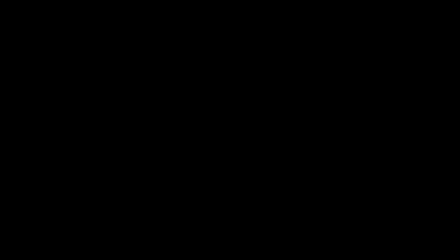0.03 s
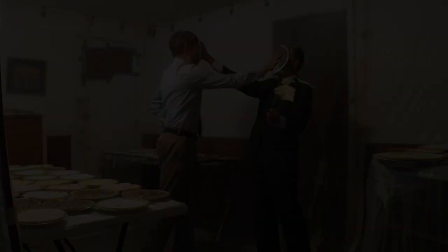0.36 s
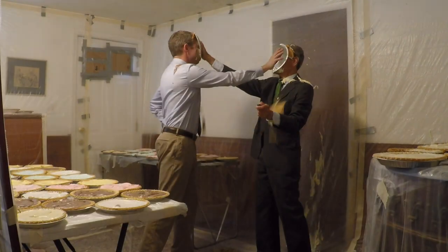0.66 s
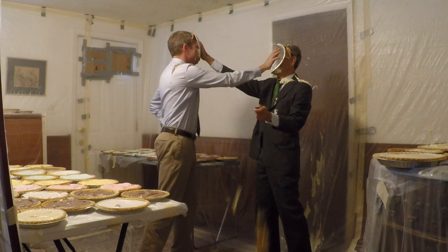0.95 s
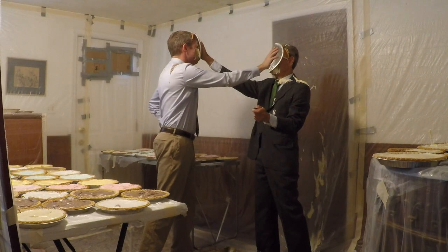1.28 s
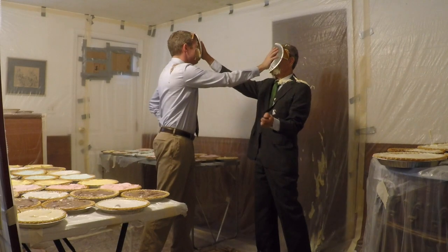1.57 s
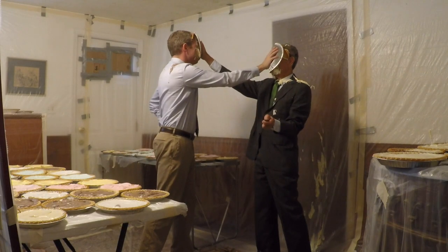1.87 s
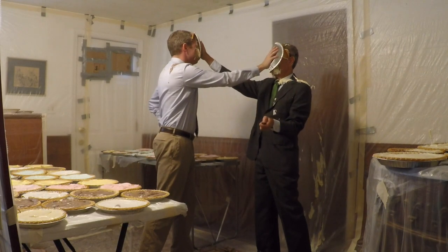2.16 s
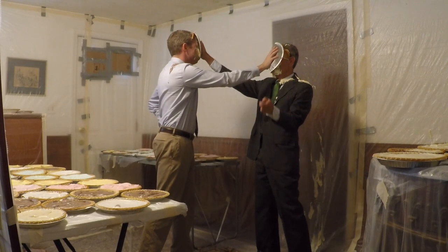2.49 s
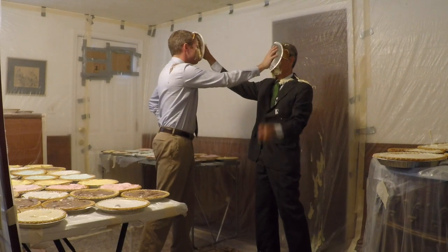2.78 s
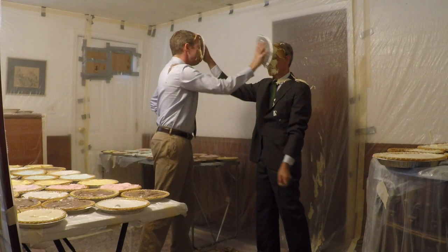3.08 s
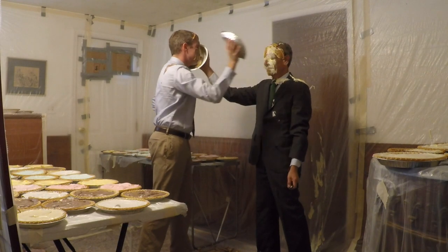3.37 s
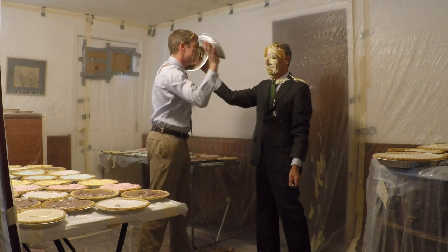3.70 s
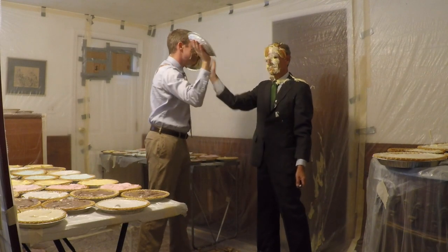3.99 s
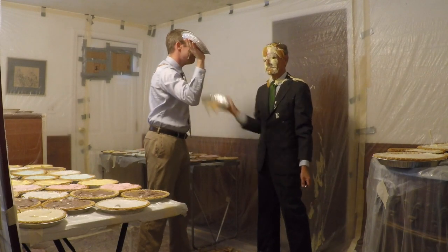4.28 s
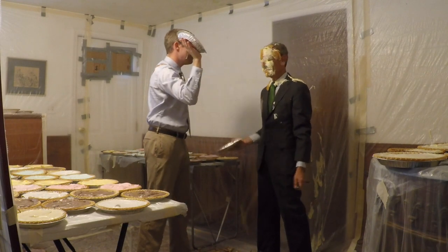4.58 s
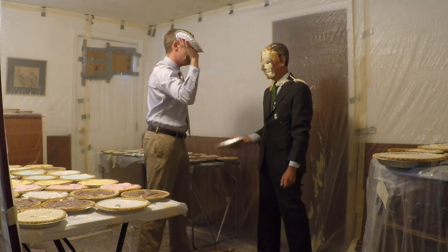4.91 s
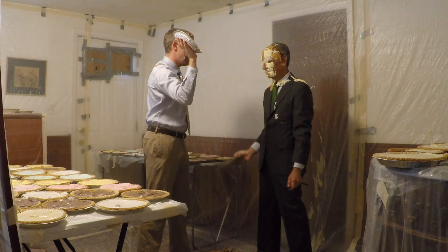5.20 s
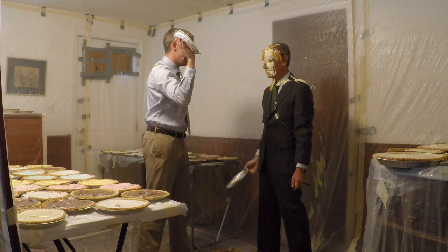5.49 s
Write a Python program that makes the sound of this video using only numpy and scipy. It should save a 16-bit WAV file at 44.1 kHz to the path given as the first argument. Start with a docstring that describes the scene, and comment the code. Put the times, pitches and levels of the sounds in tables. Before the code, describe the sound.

Cream pies are ground into faces with a soft, crackling squelch, and gobs of filling splat onto plastic sheeting. Three times a foil tin buckles with sharp cracks and a hollow knock. The tins then peel away in a run of sticky smacks, and a few more gobs fall. The microphone picks up a small room with a short ring, faint hiss and a low rumble that grows into a soft drone.

```python
"""Cream pies in the face

Two people grind cream pies into each other's faces in a small room draped with plastic sheet.
The filling squelches, gobs of it fall and splat on the sheet, and cream smacks as the tins peel away.
Now and then a foil tin buckles and springs back with a crack, a pop and a hollow knock.
Under it all lie a low room rumble and a faint hiss, joined late by a deep swell and a drone."""
import sys
import numpy as np
from scipy import signal
from scipy.fft import rfft, irfft, next_fast_len
from scipy.io import wavfile
from scipy.ndimage import map_coordinates

SR = 44100
rng = np.random.default_rng(int(sys.argv[2]) if len(sys.argv) > 2 else 0)


def waveform_to_disk(signal):
    """Save audio, clipped to [-1, 1], as 16-bit WAV at the path in sys.argv[1]."""
    frames = np.transpose(np.atleast_2d(signal))
    scaled = np.clip(frames, -1, 1) * 32767
    samples = np.round(scaled).astype(np.int16)
    wavfile.write(sys.argv[1], SR, samples)


N = 249165

# the low end of the room tone: freq_hz, level_db
RUMBLE_SPECTRUM = [(12, -37), (20, -9.5), (65, -2.5), (79, -12), (97, -17), (123, -10), (140, -23),
                   (177, -15.5), (205, -24.5), (244, -17.5), (268, -28.5), (315, -17), (335, -27.5),
                   (900, -38), (1170, -78), (1980, -120)]
# the airy top of the room tone: freq_hz, level_db
HISS_SPECTRUM = [(500, -20), (900, 2), (1600, -0.5), (2400, 1), (5000, -1), (8000, -8), (13800, -10.5),
                 (15500, -14.5)]
# how long the walls ring: freq_hz, t60_s
ROOM_DECAY = [(150, 0.52), (600, 0.28), (3000, 0.24), (12000, 0.3)]
# slow pushes and wipes of a tin across a face: start_s, hold_s, level_db
STROKES = [(0.139, 0.14, -50.5), (.3, 0.27, -49), (.56, 0.12, -51.5), (1.002, 0.13, -55), (1.45, 0.16, -65),
           (3.352, 0.093, -59.5), (3.9, .2, -63.5), (4.15, 0.19, -62), (4.48, .5, -69)]
# suction letting go between tin and skin: start_s, level_db, hollow_over_crackle_db
SMACKS = [(1.582, -56.5, -15), (2.686, -47, -16.5), (3.034, -57, 5), (3.325, -52, 5.5), (3.38, -50, 6.5),
          (3.486, -48.5, 4), (3.569, -49.5, 0.5), (3.778, -54.5, 2), (3.794, -50, 5), (3.832, -56, -2),
          (3.891, -66.5, 15.5)]
# the sticky crackle of a smack: freq_hz, level_db
SUCTION_SPECTRUM = [(600, 5), (1300, 4), (1700, -1.5), (2300, 0.5), (2750, 4), (3300, 0), (4300, -4),
                    (5500, -13), (8700, -30), (15000, -35)]
# the hollow behind a peeling tin: freq_hz, level_db
CAVITY_SPECTRUM = [(150, -25), (300, -18.5), (420, -6.5), (530, -4.5), (640, 1), (750, -0.5), (830, -11),
                   (1100, -11.5), (1600, -29), (3500, -49)]
# foil buckling: start_s, crack_db, crack_hz, width_octaves, knock_db
FOIL_SNAPS = [(.768, -24.5, 3840, .17, -29), (0.78, -21, 4000, 0.59, -20.5), (.816, -33.5, 6700, 0.41, -27),
              (2.3388, -37.5, 6000, 1.5, -27.5), (2.377, -30.5, 2600, 0.59, -28),
              (2.821, -23.5, 3840, 0.11, -36), (2.827, -34.5, 1900, 0.6, -25.5),
              (2.833, -27, 3660, .26, -26.5), (2.869, -33.5, 6300, 0.59, -28.5)]
# the hollow knock of a cream-filled tin: pitch_hz, level_db, t60_s
TIN_MODES = [(58, -10, 0.099), (123.4, -7.5, 0.125), (313.4, -5, 0.072), (523, -10, 0.11),
             (577, -4.5, 0.077), (615.5, -0.5, 0.1), (743, -5.5, 0.068), (846, -13.5, 0.1),
             (1055, -6, 0.061), (1820, -12.5, 0.03)]
# gobs landing on the sheet: start_s, level_db, weight (0 = fleck, 1 = heavy lump), t60_s
SPLATS = [(.167, -58, 0.64, .1), (.278, -42.5, 0.84, 0.46), (.315, -43.5, 0.44, 0.47),
          (.379, -44.5, 0.96, 0.3), (.432, -43.5, 0.39, .035), (.624, -38.5, 0.66, 0.22),
          (.707, -42, .8, 0.61), (.75, -45, 0.95, .08), (.8155, -35, 0.077, 0.035), (.985, -38, 0.92, 0.17),
          (.998, -39.5, 0.84, 0.25), (1.066, -42, 0.96, .15), (1.076, -34.5, 0.81, 0.25),
          (1.152, -43, 0.91, 0.24), (1.204, -42, .8, 0.32), (1.474, -52.5, 0, .12), (1.558, -52.5, 0, 0.14),
          (2.267, -44.5, 0.34, 0.085), (2.337, -38, 0.5, 0.11), (2.354, -42, 0.19, .1),
          (2.367, -38.5, 0.43, .09), (2.39, -39.5, 0.51, 0.1), (2.41, -45, 0.58, .05),
          (2.803, -38.5, 0.31, 0.14), (2.868, -39.5, 0.59, 0.1), (3.96, -56.5, 0.16, 0.19),
          (4.105, -55, 0.46, 0.35), (4.144, -49, 0.72, 0.29), (4.179, -44.5, 0.44, 0.21),
          (4.248, -48.5, 0, 0.12), (4.374, -57, 0, 0.65), (4.685, -44.5, 0.73, 0.16),
          (4.725, -43, 0.79, 0.21), (4.74, -41.5, 0.89, 0.2), (4.891, -56.5, 0, 0.12),
          (4.972, -49, 0.081, .13), (5.021, -56, 0.44, .2)]
# the dull thud of a gob on the sheet: freq_hz, level_db
THUD_SPECTRUM = [(50, -9.5), (130, -15.5), (180, -3.5), (220, -4.5), (260, -7.5), (340, -4.5), (520, -18.5),
                 (1500, -55)]
# the round, wet body of squashed cream: freq_hz, level_db
PLOP_SPECTRUM = [(120, -40), (300, -3.5), (410, -4.5), (500, 1.5), (600, 2), (760, -3), (900, -11),
                 (1150, -11.5), (1550, -33.5), (3500, -38)]
# the bright spatter of fine droplets: freq_hz, level_db
SPRAY_SPECTRUM = [(500, -9), (1200, -3), (1650, -6), (2500, 1.5), (3000, 1.5), (3400, -3), (4100, 1),
                  (4700, -3), (5900, -1), (7000, -9), (8800, -16), (13700, -18), (15500, -36)]


def amp(db):
    """Decibels to gain."""
    return 10 ** (np.asarray(db) / 20)


def curve_at(points, hz):
    """A curve of (freq_hz, value) points, read on a log frequency axis."""
    freqs, values = np.transpose(points)
    return np.interp(np.log(hz + 1), np.log(freqs + 1), values)


def wobble(rate_hz):
    """A smooth random drift with rate_hz knots a second."""
    knots = rng.standard_normal(int(N * rate_hz / SR) + 4)
    return map_coordinates(knots, [np.arange(N) * rate_hz / SR])


def colour(x, spectrum):
    """EQ a sound to a spectrum with a minimum-phase filter of unit energy."""
    size = 4096
    gain = amp(curve_at(spectrum, np.fft.rfftfreq(size, 1 / SR)))
    cepstrum = irfft(np.log(gain))
    cepstrum[1:size // 2] *= 2  # folded forward, so nothing rings ahead of a hit
    cepstrum[size // 2 + 1:] = 0
    response = irfft(np.exp(rfft(cepstrum)))
    return signal.fftconvolve(x, response / np.linalg.norm(response))[:len(x)]


def add(track, start_s, sound):
    """Mix a sound in at start_s."""
    part = track[max(round(start_s * SR), 0):][:len(sound)]
    part += sound[:len(part)]


def shaped(grain, envelope):
    """A texture under an envelope, scaled to the envelope's energy."""
    return grain * envelope * np.linalg.norm(envelope) / np.linalg.norm(grain * envelope)


def droplets(size, per_s, spread_db):
    """Tiny impacts at random moments and of scattered sizes, rms 1."""
    lands = rng.random(size) < per_s / SR
    clicks = lands * rng.choice([-1, 1], size)
    clicks = clicks * amp(spread_db * np.clip(rng.standard_normal(size), -2, 2))
    return clicks / np.sqrt(np.mean(clicks ** 2) + 1e-20)


def wet_bursts(events, spectrum, drops_per_s, rise_s, hold_s):
    """A few droplets run ahead, the mass hits and spreads, and the patter dies away."""
    out = np.zeros(N)
    t = np.arange(-SR // 32, SR // 3) / SR
    forerunners = amp(-17 - 60 * np.abs(t) / 0.051)
    for start_s, level_db, t60_s, shift_octaves in events:
        attack = 1 - np.exp(-np.maximum(t, 0) / rise_s)
        decay = amp(-60 * np.maximum(t - hold_s, 0) / t60_s)
        envelope = np.maximum(forerunners, attack * decay)
        patter = shaped(droplets(len(t), drops_per_s, spread_db=3), envelope)
        pitched = [(hz * 2 ** shift_octaves, db) for hz, db in spectrum]
        add(out, start_s + t[0], amp(level_db) * colour(patter, pitched))
    return out


def room(x, wet_db):
    """The direct sound and the quick answer of the walls, in which the bass rings longest."""
    hz, t, noise = signal.stft(rng.standard_normal(SR // 2), SR, nperseg=256)
    decay = amp(-60 * t / curve_at(ROOM_DECAY, hz)[:, None])
    tail = signal.istft(noise * decay, SR, nperseg=256)[1]
    tail = np.pad(tail / np.linalg.norm(tail), (round(0.003 * SR), 0))  # 3 ms of pre-delay
    return x + amp(wet_db) * signal.fftconvolve(x, tail)[:N]


def hum(pitch_hz, drift_hz):
    """A sine of rms 1 whose pitch wavers."""
    return np.sqrt(2) * np.sin(2 * np.pi * np.cumsum(pitch_hz + drift_hz * wobble(22)) / SR)


def room_tone(swell_peak_s=4.19, drone_start_s=4.6):
    """A bed of rumble and hiss, one brief deep swell, and a low drone that sets in and stays."""
    t = np.arange(N) / SR
    rumble = amp(-50) * colour(rng.standard_normal(N), RUMBLE_SPECTRUM)
    hiss = amp(-66) * colour(rng.standard_normal(N), HISS_SPECTRUM)
    drone = amp(-50) * np.clip((t - drone_start_s) / 0.22, 0, 1) * hum(66.2, drift_hz=2.67)
    swell = amp(-44.5) / (1 + ((t - swell_peak_s) / 0.16) ** 2) * hum(42, drift_hz=2.75)
    return rumble + hiss + drone + swell


def pressure_db(rise_db_per_s=84, fall_db_per_s=53):
    """Each stroke builds, holds and eases off; the strongest at any moment sets the level."""
    t = np.arange(N) / SR
    strokes = [level_db - rise_db_per_s * np.maximum(start_s - t, 0)
               - fall_db_per_s * np.maximum(t - start_s - hold_s, 0)
               for start_s, hold_s, level_db in STROKES]
    return np.max(strokes, axis=0)


def smear():
    """Cream squeezed between tin and face squelches and crackles in clumps, louder under pressure."""
    flow = amp(pressure_db() + 1.3 * wobble(60))
    squelch = flow * droplets(N, per_s=1500, spread_db=3)
    crackle = flow * droplets(N, per_s=2000, spread_db=5)
    return amp(3) * colour(squelch, PLOP_SPECTRUM) + colour(crackle, SPRAY_SPECTRUM)


def smacks(rise_s=0.00059, hold_s=0.004, t60_s=0.28):
    """Air breaks into the cream behind a tin: the hollow resounds under a dull, sticky crackle."""
    hollows = [(start_s, db + hollow_db, t60_s, 0) for start_s, db, hollow_db in SMACKS]
    crackles = [(start_s, db, t60_s, 0) for start_s, db, _ in SMACKS]
    return (wet_bursts(hollows, CAVITY_SPECTRUM, drops_per_s=1200, rise_s=rise_s, hold_s=hold_s)
            + wet_bursts(crackles, SUCTION_SPECTRUM, drops_per_s=2200, rise_s=rise_s, hold_s=hold_s))


def foil_crack(t, pitch_hz, width_octaves, t60_s, hold_s=0.001, rise_s=0.00011):
    """A noise band on a broad skirt of crinkle: it holds while the crease runs, then dies."""
    hz = np.fft.rfftfreq(len(t), 1 / SR) + 1
    band = np.exp(-(np.log2(hz / pitch_hz) / width_octaves) ** 2)
    skirt = amp(-25) / (1 + (hz / (2 * pitch_hz)) ** 2)
    crinkle = irfft(rfft(rng.standard_normal(len(t))) * (band + skirt), len(t))
    crease = amp(-60 * np.maximum(t - hold_s, 0) / t60_s) * (1 - np.exp(-t / rise_s))
    return shaped(crinkle, crease)


def tin_knock(t, scatter_db=1.5, rise_s=0.00076):
    """The base of a cream-filled tin rings briefly, its modes balanced differently on each hit."""
    modes = sum(amp(db + scatter_db * rng.standard_normal() - 60 * t / t60_s)
                * np.sin(2 * np.pi * hz * t) for hz, db, t60_s in TIN_MODES)
    return modes * (1 - np.exp(-t / rise_s))


def buckling_tins(hardest_pop_hz=1094, hardest_pop_db=-17):
    """Foil cracks, and the base pops inside out and knocks; a harder knock pops louder and higher."""
    out = np.zeros(N)
    t = np.arange(SR // 5) / SR
    hardest_db = max(knock_db for *_, knock_db in FOIL_SNAPS)
    for start_s, crack_db, crack_hz, width_octaves, knock_db in FOIL_SNAPS:
        force_db = knock_db - hardest_db
        pop_hz = max(hardest_pop_hz + 53 * force_db, hardest_pop_hz / 2)
        pop_db = hardest_pop_db + 1.6 * force_db
        pop = amp(pop_db) * foil_crack(t, pop_hz, width_octaves=0.3, t60_s=0.013)
        knock = amp(knock_db) * tin_knock(t)
        crack = amp(crack_db) * foil_crack(t, crack_hz, width_octaves, t60_s=0.0099)
        add(out, start_s, crack + pop + knock)
    return out


def splat_layer(spectrum, gain_db, shift_octaves, drops_per_s):
    """One layer of all the landing gobs; weight sets gain and pitch between (fleck, heavy lump)."""
    start_s, level_db, weight, t60_s = np.transpose(SPLATS)
    layer_db = level_db + np.interp(weight, (0, 1), gain_db)
    events = zip(start_s, layer_db, t60_s, np.interp(weight, (0, 1), shift_octaves))
    return wet_bursts(events, spectrum, drops_per_s, rise_s=0.0012, hold_s=0.0058)


def splats():
    """A gob thuds on the sheet, plops as it flattens and throws a spray; heavy ones are fuller, deeper."""
    body_octaves = (0.17, -0.12)
    thud = splat_layer(THUD_SPECTRUM, gain_db=(-34.5, 7.5), shift_octaves=body_octaves, drops_per_s=3000)
    plop = splat_layer(PLOP_SPECTRUM, gain_db=(-5.5, 9), shift_octaves=body_octaves, drops_per_s=3500)
    spray = splat_layer(SPRAY_SPECTRUM, gain_db=(0, 0), shift_octaves=(0.02, -0.055), drops_per_s=4500)
    return thud + plop + spray


def scene():
    """The mono mix: the cream fills the room and the tins sit drier, all over the room tone."""
    cream = room(splats(), wet_db=-8.5) + room(smacks() + smear(), wet_db=-8.5)
    tins = room(buckling_tins(), wet_db=-18)
    return (cream + tins + room_tone())[None]


def record(dry, fade_s=0.26, top_hz=15650):
    """A quick fade-in and a steep cut of the highest treble."""
    fade_in = np.clip(np.arange(N) / SR / fade_s, 0.03, 1)
    size = next_fast_len(N + SR // 2)
    passband = np.fft.rfftfreq(size, 1 / SR) < top_hz
    return irfft(rfft(dry * fade_in, size) * passband, size)[:, :N]


dry = scene()
out = record(dry)
waveform_to_disk(out)
```